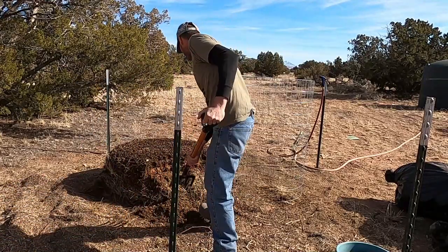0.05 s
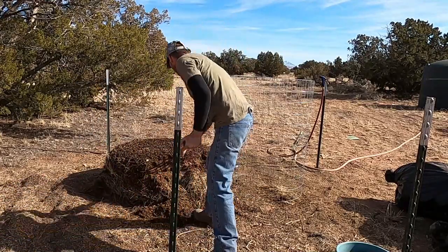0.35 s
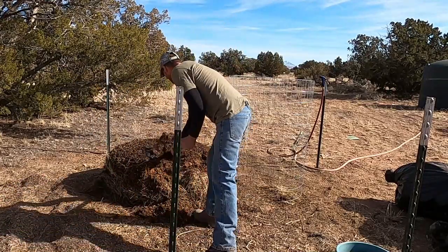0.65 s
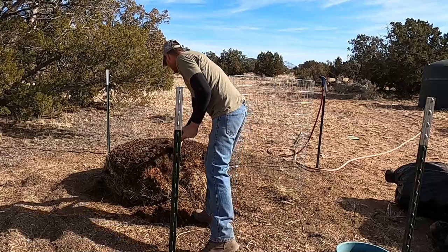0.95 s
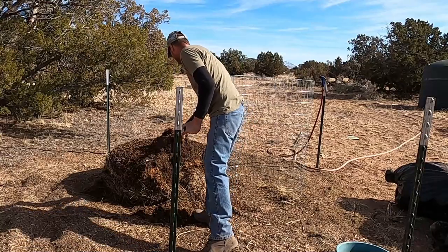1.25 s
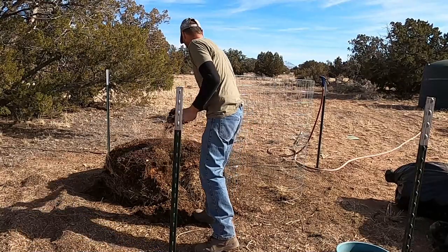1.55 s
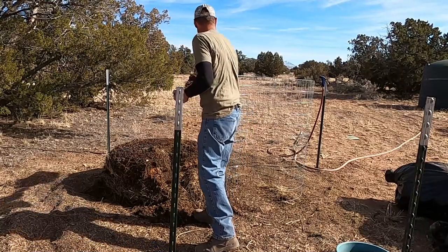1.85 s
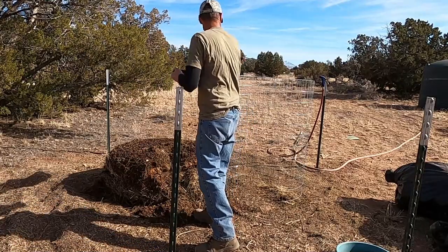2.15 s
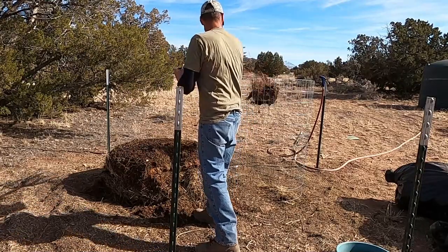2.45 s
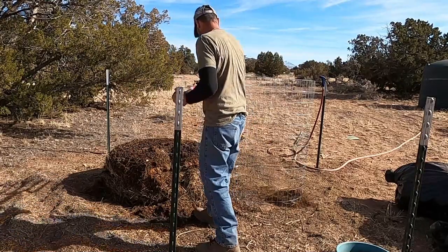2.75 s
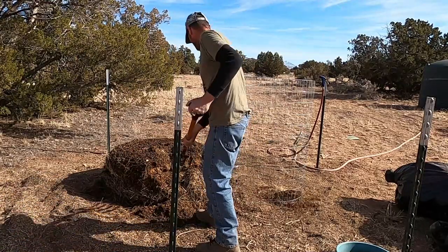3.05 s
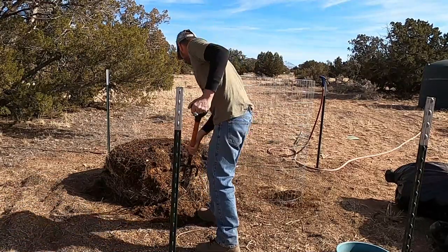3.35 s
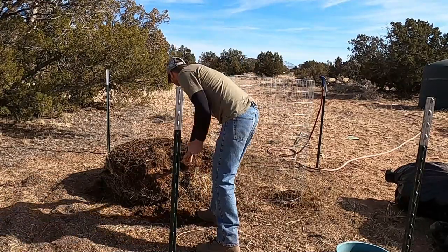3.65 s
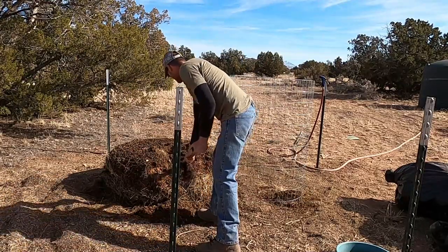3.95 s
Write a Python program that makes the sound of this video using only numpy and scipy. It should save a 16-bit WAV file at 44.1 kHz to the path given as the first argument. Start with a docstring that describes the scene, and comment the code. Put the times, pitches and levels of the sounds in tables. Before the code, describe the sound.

A steel fork crunches twice into dry compost, a forkful thudding down between, in gusty wind.

```python
"""A steel garden fork is thrust twice into dry compost: straw crackles and sets the tines ringing.
Between the thrusts a forkful tears loose, is tossed aside and lands in thuds and a spray of crumbs.
Stalks snap and dust sifts down, while wind buffets the microphone in the open yard.
Behind it are soft air in the scrub, the thin calls of a far bird and one faint, sinking whistle."""
import sys
import numpy as np
from scipy import signal
from scipy.fft import rfft, irfft
from scipy.io import wavfile
from scipy.ndimage import uniform_filter1d

SR = 44100
rng = np.random.default_rng(int(sys.argv[2]) if len(sys.argv) > 2 else 0)


def digitize_waveform(pressure):
    """Quantize a signal to 16-bit integers and store it at the path in sys.argv[1].

    Rows of a 2-D input are taken as channels; values are limited to [-1, 1].
    """
    field = np.atleast_2d(pressure).T
    bounded = np.clip(field, -1, 1)
    quanta = np.round(bounded * 32767).astype(np.int16)
    wavfile.write(sys.argv[1], SR, quanta)


N = 176400
T = np.arange(N) / SR

# pushes into the heap (entry [s], peak [s], rise [s], fall [s], crackle [dB], tine ring [dB])
FORK_PUSHES = [(0.485,0.551,0.035,0.041,-42,-47),(3.607,3.64,0.01,0.02,-31,-28),(3.66,3.713,0.039,0.03,-46,-49.5)]
# modes of the tines (frequency [Hz], level [dB], t60 [s])
TINE_MODES = [(1185,-3,.05),(1630,-11,.04),(2240,-1,.016),(2550,-5,.016),(2985,-8,.04),(3360,-7,.035),(3478,-4.5,.07),(3865,0,.03),(3985,-4,.04),(4535,-7,.03),(4860,-4,.028),(4945,-2,.04),(5280,-5,.022),(5965,-7,.028),(6720,-16,.035)]
# tines striking something hard (time [s], level [dB], centre of the excited modes [Hz])
TINE_CLINKS = [(.4923,-43,4400),(.514,-43,2700),(.5355,-35.5,2000),(.5505,-35,2900),(.5826,-33,4700),(3.6115,-35,3500),(3.629,-27,5800),(3.639,-27,3900),(3.656,-29.5,5000),(3.672,-34,3300),(3.722,-39,3500)]
# compost tearing and shifting on the fork (peak [s], rise [s], fall [s], level [dB])
TEAR_SWELLS = [(.29,0.005,0.089,-65),(0.638,0.093,0.019,-53.5),(0.789,0.21,0.13,-61),(1.04,0.017,0.017,-55.5),(1.091,0.023,0.019,-43),(1.185,0.036,0.05,-58.5),(1.5,0.039,0.024,-68),(1.58,0.093,0.12,-63),(1.636,0.0072,0.027,-44.5),(1.73,.02,0.021,-65),(2.42,0.09,0.13,-60),(2.65,0.031,0.086,-64),(3.423,0.0069,0.012,-62)]
# loose compost showering down (peak [s], rise [s], fall [s], level [dB])
SHOWER_SWELLS = [(2.879,0.021,0.022,-36.5),(2.94,0.02,0.17,-60.5)]
# lumps hitting the ground (time [s], rise [s], fall [s], level [dB], pitch [ratio])
LUMP_HITS = [(2.877,0.0066,0.011,-26,1),(3.05,0.0013,0.011,-35,1.2)]
# single crumbs and clods knocking (time [s], level [dB])
CRUMB_HITS = [(.552,-33),(1.091,-37.5),(1.655,-42),(1.692,-34.5),(1.8452,-47.5),(2.7412,-43.5),(2.7945,-41.5),(2.8065,-46.5),(2.825,-32.5),(2.846,-39),(2.851,-34.5)]
# dry stalks snapping (time [s], level [dB])
STALK_SNAPS = [(.4935,-50),(.517,-40),(.538,-43),(.553,-38),(.664,-46.5),(.7407,-44.5),(2.3366,-42),(2.351,-46),(3.051,-47)]
# fine dust sifting through straw (peak [s], rise [s], fall [s], level [dB])
DUST_SWELLS = [(.46,0.014,0.031,-64.5),(.532,0.027,0.17,-63),(1.6,0.12,0.19,-67.5),(3.03,0.055,0.11,-65.5)]
# wind on the microphone (time [s], rumble before trim [dB], flutter before trim [dB], pan left [dB])
WIND_CURVES = [(0.0,-32.5,-54,-8),(0.05,-27,-50,-6),(0.32,-32,-48,1.5),(0.39,-21.5,-42.5,0.5),(0.519,-27.5,-42,-3.5),
               (0.76,-19.5,-32,5.5),(0.8,-27,-40.5,-3.5),(0.97,-24,-44.5,-9),(1.47,-25.5,-53,-3),(1.63,-38,-55.5,-4.5),(1.97,-24,-43.5,-11.5),
               (2.12,-22,-49,-8),(2.189,-28.5,-40,-3),(2.53,-32,-71,-11),
               (2.59,-40,-57,-4.5),(2.9,-34.5,-58.5,-0.5),(2.97,-44.5,-58,-2.5),
               (3.06,-40.5,-45,-3),(3.17,-33,-71,-8),(3.35,-37.5,-68,0.5),(3.5,-29,-48.5,-4),
               (3.78,-21,-43.5,1),(3.829,-20,-30,4),(4.0,-24.5,-38.5,-3)]
# hard buffets of wind (peak [s], rise [s], fall [s], level [dB], pitch [ratio])
WIND_BUFFETS = [(.56,0.025,0.027,-26.5,0.73),(0.71,0.075,0.033,-31.5,0.99),(0.759,0.007,0.012,-17.5,0.71),(2.108,0.024,0.01,-22,.5),(3.807,0.019,0.08,-20.5,0.96),(3.883,0.02,0.041,-26.5,1.19)]
# bed of air in the scrub (time [s], level [dB])
AIR_FADER = [(0,-59.5),(.4,-63),(2.1,-61),(3.1,-58.5),(4,-57.5)]
# far bird calls (start [s], length [s], level [dB])
BIRD_CALLS = [(2.551,0.073,-75.5),(2.73,0.054,-74.5),(3.065,0.22,-83),(3.278,.12,-78)]
# faint whistle (start [s], length [s], level [dB], start pitch [Hz], end pitch [Hz], waver [Hz])
SINKING_NOTE = (2.9, .46, -65, 1790, 1560, 70)

# tone colour of each layer (frequency [Hz], relative level [dB])
STRAW_EQ = [(300,-15),(750,-4),(1200,4),(2300,9.5),(3200,3.5),(5500,0.5),(6500,-9.5),(7800,-6.5),(9000,-16),(13000,-28.5),(15500,-58)]  # bright crackle
TEAR_EQ = [(300,-17),(620,-2.5),(1200,6.5),(2100,1),(4500,-12),(7500,-22),(9000,-34.5),(14000,-54)]  # midrange rip
SPRAY_EQ = [(200,-12),(500,6),(850,-4),(1400,0.5),(3000,-3.5),(5000,-4),(7800,-13),(9000,-20),(13000,-26),(15500,-42)]  # broad patter
THUD_EQ = [(30,-15),(70,-3),(140,-4.5),(250,-1),(400,-15.5),(560,-15),(800,-25),(1600,-56)]  # low body of a lump
CRUMB_EQ = [(250,-14),(700,-11.5),(1250,3.5),(1900,-5),(3000,-17.5),(6000,-38),(9000,-43),(15000,-52)]  # dull knock
DUST_EQ = [(1000,-4.5),(3000,-1.5),(5500,2.5),(7700,0.5),(9000,-10),(12500,-16.5),(15500,-22)]  # fine hiss
RUMBLE_EQ = [(12,-15.5),(25,1),(45,1),(80,-3.5),(125,-11.5),(180,-19),(250,-36.5),(350,-40.5),(600,-102)]  # deep bass of the wind
FLUTTER_EQ = [(60,-26.5),(120,8),(200,1.5),(260,-6),(350,-21),(600,-29.5),(1000,-79)]  # upper bass of the wind
BUFFET_EQ = [(60,-11),(110,4),(200,-2.5),(300,-5.5),(400,-13),(500,-21.5),(650,-36.5),(2000,-87.5)]  # boom of a gust
AIR_EQ = [(100,8.5),(400,3),(750,-5),(1200,-0.5),(1700,-7),(2500,-13.5),(4000,-18),(5600,-17),(7700,-19.5),(8600,-32),(12000,-40.5)]  # soft, dark wash

GRAINS_PER_S = 3500
TINE_DETUNE = .005  # the heap's grip shifts each mode per contact, as a share of its frequency
CLINK_RISE_S, CLINK_OCTAVES = 0.00113, 0.38  # contact time; spread of the modes one contact excites
SLIDE_HZ, SLIDE_DB, SLIDE_RISE_S = 5600, -62.5, 0.037  # thin ring of tines sliding in over straw
LUMP_CONTACT_DB = 13.5  # first contact above the crumbling
RUMBLE_TRIM_DB, FLUTTER_TRIM_DB, BUFFET_PAN_DB = 3.5, 6, -12
GUST_DB, GUSTS_PER_S, AIR_SWELL_DB = 1.5, 13, 1.5
BIRD_HZ, BIRD_SAG_HZ_PER_S = 7260, 570
PORT_SPREAD_HZ = 7200  # above this the left port lags the right by a quarter cycle
HIGH_CUT_HZ = 15700


def fork():
    """Straw crackles along the tines and rings them; each hard bit brings out other modes."""
    crackle, steel = np.zeros(N), np.zeros(N)
    catching = undb(2 * drift(200))
    slide = sine(SLIDE_HZ + 120 * drift(600))
    for entry, at, rise, fall, crackle_db, ring_db in FORK_PUSHES:
        push = swell(at, rise, fall) * (T > entry) * catching
        crackle += undb(crackle_db) * push
        ring = unit_energy(tine_ring())
        steel += through(undb(ring_db) * push * grains(spread_db=3), ring)
        steel += undb(SLIDE_DB) * swell(entry, SLIDE_RISE_S, fall) * slide
    straw = through(crackle * grains(spread_db=3.5), eq(STRAW_EQ))
    for at, db, centre in TINE_CLINKS:
        ring = tine_ring(lambda hz: np.exp(-(np.log2(hz / centre) / CLINK_OCTAVES) ** 2))
        ring *= 1 - np.exp(-T[:len(ring)] / CLINK_RISE_S)
        steel += through(hits([(at, db)], grit=0.012, fall_s=0.0017), unit_peak(ring))
    return place(straw, pan_db=-1, width=.36) + place(steel, pan_db=1.5, width=.22)


def tine_ring(weight=np.ones_like):
    """One contact rings the tines, damped by the heap; weight scales each mode by its frequency."""
    t = T[:SR // 4]
    hz, db, t60 = np.array(TINE_MODES, float).T[:, :, None]
    hz = hz * (1 + TINE_DETUNE * rng.standard_normal(hz.shape))
    signs = (-1) ** np.arange(len(hz))[:, None]
    modes = np.sin(2 * np.pi * hz * t) * np.exp(-np.log(1000) * t / t60)
    return np.sum(signs * weight(hz) * undb(db) * modes, axis=0)


def tearing():
    """Fibres part with a grainy rip as the forkful is levered out and lifted."""
    rip = through(swells(TEAR_SWELLS) * grains(spread_db=1.5), eq(TEAR_EQ))
    return place(rip, pan_db=1.5, width=0.2)


def landing():
    """The forkful showers onto dry ground; each lump thuds and crumbles."""
    spray = through(swells(SHOWER_SWELLS) * grains(spread_db=1.5), eq(SPRAY_EQ))
    thuds = np.zeros(N)
    for at, rise, fall, db, pitch in LUMP_HITS:
        impact = swell(at, rise, fall) * noise()
        impact[int(at * SR)] += undb(LUMP_CONTACT_DB)
        thuds += undb(db) * through(impact, eq(THUD_EQ, pitch))
    return place(spray, pan_db=-1, width=0.32) + place(thuds, pan_db=-2.5, width=0.098)


def debris():
    """Crumbs knock dully and dry stalks snap."""
    knocks = through(hits(CRUMB_HITS, grit=0.095, fall_s=0.0071), unit_peak(eq(CRUMB_EQ)))
    snaps = through(hits(STALK_SNAPS, grit=0.14, fall_s=0.0028), unit_peak(eq(STRAW_EQ)))
    return place(knocks, pan_db=-1.5, width=.25) + place(snaps, pan_db=1, width=0.25)


def dust():
    """Dust and chaff trickle off the fork and over the ground in a fine hiss."""
    trickle = through(swells(DUST_SWELLS) * grains(spread_db=2.5), eq(DUST_EQ))
    return place(trickle, pan_db=-5, width=.4)


def wind():
    """Eddies rumble and flutter at each microphone port; hard gusts hit as short, higher buffets."""
    times, *curves = np.array(WIND_CURVES, float).T
    rumble_db, flutter_db, pan_db = (np.interp(T, times, curve) for curve in curves)
    ports, buffets = np.zeros((2, N)), np.zeros((2, N))
    for port in range(2):
        eddy, gust = drift(30), undb(GUST_DB * drift(GUSTS_PER_S))
        rumble = through(noise(), eq(RUMBLE_EQ)) * undb(rumble_db + RUMBLE_TRIM_DB + 1.9 * eddy)
        flutter = through(noise(), eq(FLUTTER_EQ)) * undb(flutter_db + FLUTTER_TRIM_DB + 3.97 * eddy)
        ports[port] = (rumble + flutter) * gust
        for at, rise, fall, db, pitch in WIND_BUFFETS:
            buffets[port] += through(noise() * undb(db) * swell(at, rise, fall), eq(BUFFET_EQ, pitch))
    sides = pan(pan_db)
    sides /= np.sqrt(np.mean(sides ** 2, axis=0))  # constant power
    low_cut = signal.butter(2, 14, "high", fs=SR, output="sos")
    return signal.sosfilt(low_cut, ports * sides + buffets * pan(BUFFET_PAN_DB))


def yard_air():
    """Air moves through the scrub as a soft, wide bed."""
    level_db = np.interp(T, *np.array(AIR_FADER, float).T) + AIR_SWELL_DB * drift(25)
    air = through(noise(), eq(AIR_EQ)) * undb(level_db)
    return place(air, pan_db=-1, width=.7, scatter_s=0.027)


def faint_whistle():
    """A faint, unsteady whistle sinks in pitch after the forkful lands."""
    at, length, db, start_hz, end_hz, waver_hz = SINKING_NOTE
    progress = np.clip((T - at) / length, 0, 1)
    hz = start_hz + (end_hz - start_hz) * progress + waver_hz * drift(250)
    level = np.sqrt(np.abs(np.sin(np.pi * progress))) * undb(db + 2.7 * drift(36))
    return place(level * sine(hz), pan_db=1, width=.4)


def far_bird():
    """A small bird whistles thinly, far off to the right; each call sags in pitch."""
    calls = np.zeros(N)
    for at, length, db in BIRD_CALLS:
        age = np.clip(T - at, 0, length)
        hz = BIRD_HZ - BIRD_SAG_HZ_PER_S * age + 90 * drift(280)
        calls += undb(db) * np.sin(np.pi * age / length) * sine(hz)
    return place(calls, pan_db=-16, width=.3)


def grains(spread_db):
    """A texture of dense, tiny fractures of uneven size, at rms 1."""
    size = undb(spread_db * np.minimum(rng.exponential(size=N), 4))
    fires = rng.random(N) < GRAINS_PER_S / SR
    return unit_rms(fires * size * np.sign(noise()))


def hits(rows, grit, fall_s):
    """A sharp click for each row, with a short tail of grit."""
    track = np.zeros(N)
    for at, db in rows:
        track[int(at * SR)] += undb(db)
        track += undb(db) * grit * noise() * (T > at) * np.exp(-np.abs(T - at) / fall_s)
    return track


def swell(at, rise, fall):
    """Envelope with an exponential attack and decay around its peak."""
    return np.exp(-np.where(T < at, (at - T) / rise, (T - at) / fall))


def swells(rows):
    """One envelope from overlapping swells, each at its own level."""
    return sum(undb(db) * swell(at, rise, fall) for at, rise, fall, db in rows)


def place(x, pan_db, width, scatter_s=0.01):
    """Two close microphone ports: the left lags a little, and ground scatter adds width."""
    ground = (noise() * np.exp(-T / scatter_s))[:SR // 10]
    scattered = through(x, unit_energy(ground))
    hz = np.fft.rfftfreq(2 * N, 1 / SR)
    lag = irfft(-1j * np.minimum(hz / PORT_SPREAD_HZ, 1) * rfft(x, 2 * N))[:N]
    side = lag + width * scattered
    return np.array([x + side, x - side]) * pan(pan_db)


def pan(db):
    """Left and right gains, db apart; positive leans left."""
    return undb(np.vstack([db, -db]) / 2)


def eq(points, pitch=1, size=8192):
    """Impulse response of an EQ curve shifted by a pitch ratio, with energy 1."""
    hz, db = np.array(points, float).T
    bins = np.maximum(np.fft.rfftfreq(size, 1 / SR), 1)
    gain = undb(np.interp(np.log(bins), np.log(hz * pitch), db))
    cepstrum = irfft(np.log(gain))
    cepstrum[1:size // 2] *= 2  # minimum phase keeps attacks sharp
    cepstrum[size // 2 + 1:] = 0
    return unit_energy(irfft(np.exp(rfft(cepstrum))))


def through(x, response):
    """Play a sound through an impulse response."""
    return signal.fftconvolve(x, response)[:N]


def drift(rate_hz):
    """Smooth random modulation at rms 1."""
    hold = int(SR / rate_hz)
    steps = np.repeat(rng.standard_normal(N // hold + 1), hold)[:N]
    return unit_rms(uniform_filter1d(steps, hold))


def sine(hz):
    """A sine that follows a pitch curve."""
    return np.sin(2 * np.pi * np.cumsum(hz) / SR)


def noise():
    """White noise."""
    return rng.standard_normal(N)


def undb(db):
    """Decibels to gain."""
    return 10 ** (np.asarray(db) / 20)


def unit_rms(x):
    """Normalise to rms 1."""
    return x / np.sqrt(np.mean(x ** 2))


def unit_energy(x):
    """Normalise to energy 1."""
    return x / np.sqrt(np.sum(x ** 2))


def unit_peak(x):
    """Normalise to peak 1."""
    return x / np.abs(x).max()


def scene():
    """The mix: digging and tossing up front, then wind and the open yard."""
    digging = fork() + tearing() + landing() + debris() + dust()
    return digging + wind() + yard_air() + faint_whistle() + far_bird()


def record(dry):
    """A steep high cut takes off the very top."""
    return signal.sosfilt(signal.ellip(8, .2, 70, HIGH_CUT_HZ, fs=SR, output="sos"), dry)


dry = scene()
out = record(dry)
digitize_waveform(out)
```